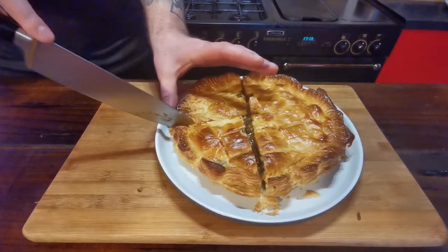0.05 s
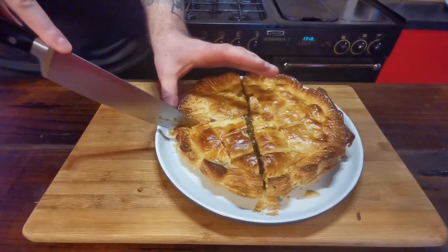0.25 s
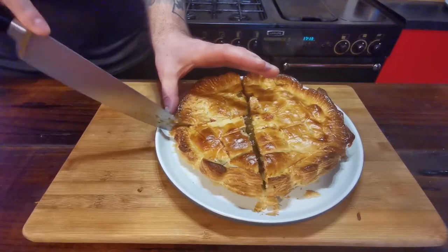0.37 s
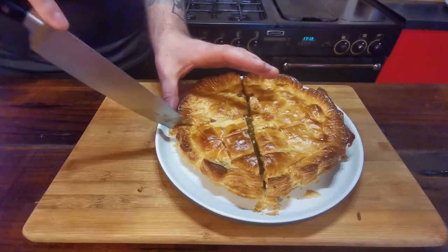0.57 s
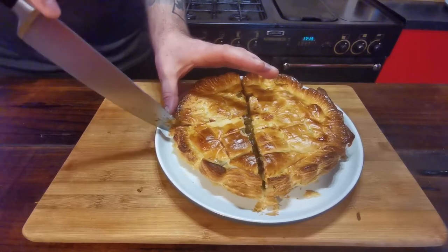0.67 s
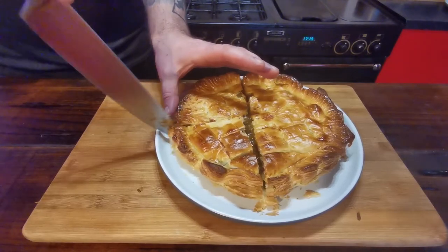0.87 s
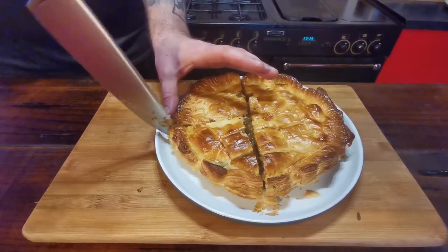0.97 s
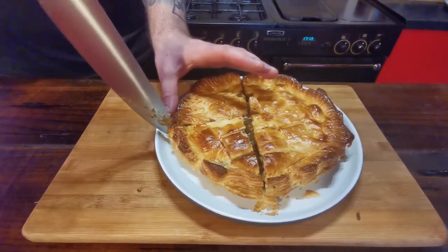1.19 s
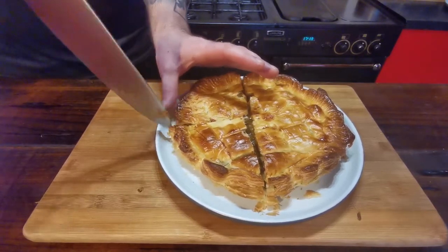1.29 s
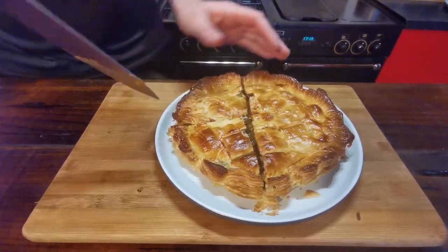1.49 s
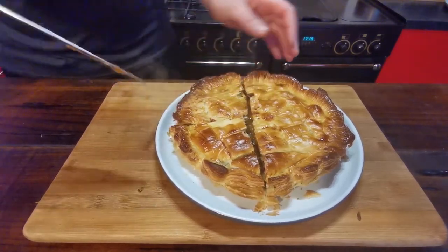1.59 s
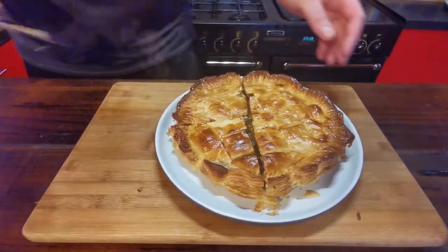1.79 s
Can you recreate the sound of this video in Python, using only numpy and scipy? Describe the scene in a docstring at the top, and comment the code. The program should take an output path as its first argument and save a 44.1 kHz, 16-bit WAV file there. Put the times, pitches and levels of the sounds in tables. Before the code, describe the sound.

Close to the microphone in a kitchen, crisp pastry crunches in short bursts under a knife. The blade clacks on a ceramic plate, drags over it and grates on the rim, then a few faint crackles follow.

```python
"""In a hard-walled kitchen, a knife saws through a pie on a ceramic plate, near a stereo microphone.
The crust crackles by brittle fracture with each push. The blade knocks on the plate, whose modes the
pie damps, and drags over it by stick-slip friction; the wooden board beneath thuds in response.
The steel tings once at the start and a sleeve brushes at the end. The walls reverberate over a
faint hiss and the hum of an appliance."""
import sys
import numpy as np
from scipy import signal
from scipy.fft import rfft, irfft, next_fast_len
from scipy.io import wavfile

SR = 44100
rng = np.random.default_rng(int(sys.argv[2]) if len(sys.argv) > 2 else 0)


def put_to_file(sound):
    """Save the sound as 16-bit audio at rate SR, in the file named by the first command-line argument."""
    columns = np.atleast_2d(sound).T  # one column per channel
    safe = np.clip(columns, -1, 1)
    whole_steps = np.round(safe * 32767)
    wavfile.write(sys.argv[1], SR, whole_steps.astype(np.int16))


N = 81585

# Crust giving way under the blade. Each row: time in seconds, level in dB.
CRUNCH_LEVELS = [(0, -65), (.12, -61.5), (.195, -67.5), (.222, -59), (.24, -44), (.3, -49.5), (.35, -76),
                 (.43, -57.5), (.51, -72.5), (.55, -48), (.6, -55.5), (.68, -69), (.745, -48.5),
                 (.775, -48), (.8, -67.5), (.86, -64), (.93, -73.5), (.988, -46), (1.02, -45.5),
                 (1.12, -67), (1.33, -72), (1.4, -63), (1.46, -81.5), (1.85, -89)]
# Single flakes snapping. Each row: start in seconds, level in dB.
FLAKE_SNAPS = [(0.0775, -36.5), (0.2032, -42), (0.2076, -41.5), (0.221, -43), (.228, -40.5), (.2335, -27.5),
               (.375, -45.5), (.529, -41), (.549, -36), (.5585, -28.5), (0.7742, -34.5), (0.987, -35.5),
               (1.367, -48.5), (1.393, -45), (1.418, -48.5)]
# Spectrum of breaking pastry. Each row: frequency in Hz, relative level in dB.
PASTRY_SPECTRUM = [(300, -22), (1500, -12), (3000, -6.5), (4300, -2), (5900, 1), (7000, -9.5), (8200, -17),
                   (9600, -6), (11200, 2), (12500, -8), (14200, -17), (15500, -16)]
FLAKES_PER_S, FLAKE_SPREAD_DB, FLAKE_T60_S, SNAP_T60_S = 3300, 2, .0018, .0058

# Impacts of blade on plate. Each row: start in seconds, low, middle and high register gains in dB,
# tuning ratio, contact time in seconds, board gain in dB.
IMPACTS = [(0.2464, -18, -32, -43, 1, 0.0032, -40), (0.276, -26, -51, -62, 0.9, 0.0078, -48),
           (.4955, -26.5, -28, -30.5, 1.0, .0008, -67.5), (.5582, -16, -16, -15, .993, .0015, -43),
           (.5665, -25, -20, -25.5, 1.0, 0.0018, -44.5), (.852, -16, -50, -59.5, 1.02, 0.0067, -45.5),
           (1.0123, -18, -20.5, -15, 1.024, .0012, -33.5), (1.038, -27, -31, -45.5, 1.01, 0.0012, -40)]
# The low, middle and high registers of an impact. Each entry: frequency in Hz.
IMPACT_REGISTERS_HZ = (800, 2400, 4700)
# Modes of the plate, loaded by the pie. Each row: frequency in Hz, level in dB, T60 in seconds.
PLATE_MODES = [(557.7, -8.5, 0.044), (628, -12.5, 0.055), (720.8, -1, 0.074), (814.5, -12.5, .04),
               (1031, -17.5, 0.036), (1606, -8, 0.045), (1706, -11, 0.038), (1873.5, -0.5, 0.043),
               (1980, -2.5, .05), (2182, -5.5, 0.047), (2347, -8.5, .035), (2468, -7, 0.057),
               (2833, -7.5, 0.068), (3016, -6, 0.047), (3161, -6.5, 0.07), (4730, 3.5, .022),
               (6120, -11, 0.056), (7700, -32.5, .05), (9580, -22.5, .06), (12900, -29, .04)]
# Modes of the wooden board. Each row: frequency in Hz, level in dB, T60 in seconds.
BOARD_MODES = [(64, -18.5, 0.21), (200.7, -2.5, 0.058), (272, -0.5, 0.076)]
# Spectrum of the dry contact clack. Each row: frequency in Hz, relative level in dB.
CLACK_SPECTRUM = [(100, -48.5), (300, -18), (450, -0.5), (800, -5), (1000, -4), (1300, -9.5), (1600, -1),
                  (3100, 4.5), (3600, -7.5), (4050, -2), (4750, -3.5), (5300, -11.5), (6200, -8.5),
                  (7800, -37), (11000, -21), (13000, -28.5), (15500, -38.5)]
CLACK_DB, CLACK_T60_S = 1.5, .022
BUILD_CYCLES, MODE_SCATTER_DB, MIC_GAP_S = 1.2, 1.5, .0001

# Blade rubbing through the pie's base on to the plate. Each row: time in seconds, level in dB.
RUB_LEVELS = [(.2, -84), (.3, -54), (.39, -57.5), (.43, -49), (.48, -69), (.51, -45.5), (.66, -41),
              (.70, -38.5), (0.764, -38), (0.801, -51.5), (.835, -44), (.88, -49.5), (.93, -48),
              (0.959, -35.5), (1.006, -35.5), (1.06, -45), (1.13, -50.5), (1.25, -65), (1.359, -91)]
# Weighting of the rubbed plate's modes. Each row: frequency in Hz, relative gain in dB.
RUB_WEIGHTING = [(150, -4.5), (500, -1.5), (750, 2), (1100, -7.5), (1600, 0), (2000, -16), (3200, -10),
                 (4500, -13), (7000, -16)]
# Bare edge grating on the rim. Each row: time in seconds, level in dB.
GRATE_LEVELS = [(.70, -84), (.75, -51), (.80, -66.5), (.825, -53), (.836, -41.5), (.848, -51), (.862, -43),
                (.89, -54.5), (.91, -58), (.945, -55), (.96, -38.5), (.98, -40.5), (1.008, -39),
                (1.03, -87.5)]
# Resonances of the edge on the rim. Each row: frequency in Hz, level in dB, T60 in seconds.
EDGE_MODES = [(827, -5.5, .03), (1076, 0, .02), (1637, -1.5, 0.027), (1800, -7, 0.017), (3850, -8.5, .025)]
SLIPS_PER_S, SLIP_SPREAD_DB, BOARD_RUB_DB = 900, 1.5, -20.5

# Modes of the steel blade. Each row: frequency in Hz, level in dB, T60 in seconds.
BLADE_MODES = [(4600, -56, .35), (5570, -49, .3), (6300, -66.5, .35), (11000, -61, .2),
               (15100, -64.5, 0.14)]
TING_START_S = .076

# Sleeve brushing as the hand lifts away. Each row: time in seconds, level in dB.
SLEEVE_LEVELS = [(1.6, -93.5), (1.72, -79), (1.78, -69), (1.85, -72.5)]
# Spectrum of sliding cloth. Each row: frequency in Hz, relative level in dB.
CLOTH_SPECTRUM = [(500, -8), (2000, -2.5), (5200, 0.5), (8000, -11.5), (11000, -6), (15000, -16)]

# Reverberation time of the kitchen. Each row: frequency in Hz, T60 in seconds.
REVERB_TIMES = [(150, 0.52), (700, .5), (2000, 0.5329), (5000, 0.4961), (11000, 0.45), (16000, 0.04)]
# Strength of the reverberation. Each row: frequency in Hz, gain in dB.
REVERB_GAINS = [(150, 2), (700, -2.5), (2000, 0.5), (3500, 0), (5000, -4.5), (11000, -6.5)]
ROOM_DELAY_S, ROOM_BUILD_S = .01, .012
# Spectrum of the steady hiss. Each row: frequency in Hz, relative level in dB.
HISS_SPECTRUM = [(20, 1.5), (60, -5.5), (110, -9), (260, -10.5), (400, -13), (700, -16.5), (1100, -23.5),
                 (2100, -21), (3600, -28), (4800, -23.5), (6200, -26.5), (8000, -36), (9500, -30.5),
                 (11000, -24), (12500, -29), (14000, -37), (15700, -34.5)]
HISS_DB, HUM_HZ, HUM_DB = -66, 154, -77

# Likeness of the two channels. Each row: frequency in Hz, coherence from 0 to 1.
COHERENCE = [(60, 0.4), (290, 0.9), (700, 0.5), (1400, 0), (3000, 0.02), (15000, 0)]
# Microphone balance. Each row: frequency in Hz, level of left over right in dB.
MIC_BALANCE = [(90, 4), (270, 0.5), (500, -5.5), (750, -3), (1250, -2), (2100, -3), (3300, -2), (4700, 9.5),
               (5800, 4), (7800, -1), (9500, -9.5), (15000, -13)]
BAND_LIMIT_HZ = 15900


def crust():
    """Brittle fracture: dense tiny cracks add in energy to a crunch, and larger flakes snap singly."""
    t = np.arange(SR // 20) / SR
    cracks = impulses(FLAKES_PER_S, FLAKE_SPREAD_DB)
    energy = signal.fftconvolve(cracks ** 2, decay(t, FLAKE_T60_S) ** 2)[:N]
    crackle = np.sqrt(np.abs(energy)) * diffuse_noise(N)
    out = coloured(crackle, PASTRY_SPECTRUM) * level(CRUNCH_LEVELS)
    for start, db in FLAKE_SNAPS:
        snap = coloured(diffuse_noise(len(t)), PASTRY_SPECTRUM) * decay(t, SNAP_T60_S)
        add(out, start, amp(db) * snap)
    return out


def knocks():
    """Impact excitation: plate and board ring; contacts cushioned by pastry rise slowly and sound dull."""
    out, t = np.zeros((2, N)), np.arange(SR // 4) / SR
    for start, low_db, mid_db, high_db, tuning, contact_s, board_db in IMPACTS:
        force = list(zip(IMPACT_REGISTERS_HZ, (low_db, mid_db, high_db)))
        plate = ring([(hz * tuning, db + along(force, hz), t60) for hz, db, t60 in PLATE_MODES], t)
        board = amp(board_db) * ring(BOARD_MODES, t)
        noise = coloured(diffuse_noise(len(t)), CLACK_SPECTRUM)
        clack = amp(CLACK_DB) * filtered(noise, lambda hz: amp(along(force, hz)))
        clack *= decay(t, CLACK_T60_S) * (1 - decay(t, t60=.004))
        onset = np.sin(np.pi / 2 * np.minimum(t / contact_s, 1)) ** 2
        add(out, start, onset * (plate + board + clack))
    return out


def drag():
    """Sliding friction: the blade rubs dully on plate and board, and grates as it reaches the rim."""
    t = np.arange(SR // 4) / SR
    plate = stick_slip(coloured(ring(PLATE_MODES, t), RUB_WEIGHTING), RUB_LEVELS)
    board = amp(BOARD_RUB_DB) * stick_slip(ring(BOARD_MODES, t), RUB_LEVELS)
    rim = stick_slip(ring(EDGE_MODES, t), GRATE_LEVELS)
    return plate + board + rim


def stick_slip(body, levels):
    """Stick-slip motion: every slip of the edge excites the body's impulse response."""
    slips = unit_rms(impulses(SLIPS_PER_S, SLIP_SPREAD_DB)) * level(levels)
    return signal.fftconvolve(slips[None], body / np.linalg.norm(body[0]), axes=1)[:, :N]


def blade_ting():
    """Free vibration: one light touch leaves the weakly damped steel ringing."""
    out = np.zeros((2, N))
    add(out, TING_START_S, ring(BLADE_MODES, np.arange(SR // 2) / SR))
    return out


def sleeve():
    """Friction noise: sliding cloth gives a soft broadband brush."""
    return coloured(diffuse_noise(N), CLOTH_SPECTRUM) * level(SLEEVE_LEVELS)


def kitchen_reverb(x):
    """Reverberation: wall reflections merge into a diffuse tail whose decay depends on frequency."""
    hz, t, spectra = signal.stft(diffuse_noise(SR), SR, nperseg=256)
    t60 = along(REVERB_TIMES, hz)[:, None]
    # The square root offsets the greater energy of a longer decay.
    gain = amp(along(REVERB_GAINS, hz))[:, None] * np.sqrt(2 * np.log(1000) / (t60 * SR))
    onset = np.clip((t - ROOM_DELAY_S) / ROOM_BUILD_S, 0, 1)
    tail = signal.istft(spectra * gain * decay(t, t60) * onset, SR, nperseg=256)[1]
    return signal.fftconvolve(x, tail, axes=1)[:, :N]


def background():
    """Stationary noise: a broadband hiss and the pure tone of a humming appliance."""
    hiss = amp(HISS_DB) * coloured(diffuse_noise(N), HISS_SPECTRUM)
    hum = amp(HUM_DB) * np.sqrt(2) * np.sin(2 * np.pi * HUM_HZ * np.arange(N) / SR)
    return hiss + hum


def ring(modes, t):
    """Modal superposition: damped sinusoids, the higher ones reaching the two channels out of phase."""
    out = np.zeros((2, len(t)))
    for hz, db, t60 in modes:
        phase_gap = min(2 * np.pi * hz * MIC_GAP_S, 2.4)
        phase = rng.uniform(0, 2 * np.pi) + np.array([[.5], [-.5]]) * phase_gap * rng.choice([-1, 1])
        envelope = decay(t, t60) * (1 - np.exp(-t * hz / BUILD_CYCLES))
        out += amp(db + MODE_SCATTER_DB * rng.normal()) * np.sin(2 * np.pi * hz * t + phase) * envelope
    return out


def impulses(per_s, spread_db):
    """Poisson process: independent impulses of random sign and strength."""
    signs = (rng.random(N) < per_s / SR) * rng.choice([-1, 1], N)
    return signs * amp(spread_db * np.minimum(rng.exponential(size=N), 4))


def diffuse_noise(size):
    """Diffuse field: white stereo noise, partly coherent in the bass and incoherent in the treble."""
    def mid_side_gains(hz):
        angle = np.arccos(np.clip(along(COHERENCE, hz), -1, 1)) / 2
        return np.array([np.cos(angle), np.sin(angle)])
    mid, side = filtered(rng.standard_normal((2, size)), mid_side_gains)
    return np.array([mid + side, mid - side])


def amp(db):
    return 10 ** (np.asarray(db) / 20)


def unit_rms(x):
    return x / np.sqrt(np.mean(x ** 2) + 1e-20)


def decay(t, t60):
    """Exponential damping: 60 dB down after t60 seconds."""
    return np.exp(-np.log(1000) * t / t60)


def along(points, hz):
    """Interpolation on a logarithmic frequency axis."""
    frequencies, values = np.transpose(points)
    return np.interp(np.log(hz + 1), np.log(frequencies + 1), values)


def level(rows):
    """Amplitude envelope, interpolated in dB over time."""
    return amp(np.interp(np.arange(N) / SR, *np.transpose(rows)))


def filtered(x, response):
    """Linear filtering: the spectrum of x times a frequency response."""
    size = x.shape[-1]
    padded = next_fast_len(size + 8192)
    return irfft(rfft(x, padded) * response(np.fft.rfftfreq(padded, 1 / SR)), padded)[..., :size]


def coloured(x, spectrum):
    """Spectral shaping, normalised to unit rms."""
    return unit_rms(filtered(x, lambda hz: amp(along(spectrum, hz))))


def add(out, start_s, sound):
    i = round(start_s * SR)
    out[:, i:i + sound.shape[1]] += sound[:, :N - i]


def scene():
    """Superposition: the cutting and its reverberation add to the sleeve and the background."""
    cutting = knocks() + drag() + crust() + blade_ting()
    return cutting + kitchen_reverb(cutting) + sleeve() + background()


def record(dry):
    """Frequency response: each microphone channel has its own colour, up to a common band limit."""
    left_right = np.array([[.5], [-.5]])
    return filtered(dry, lambda hz: amp(along(MIC_BALANCE, hz) * left_right) * (hz < BAND_LIMIT_HZ))


dry = scene()
out = record(dry)
put_to_file(out)
```